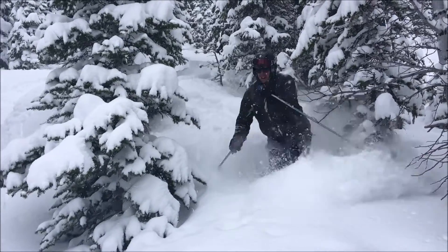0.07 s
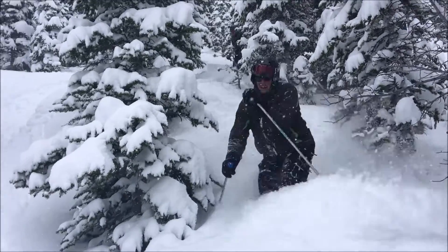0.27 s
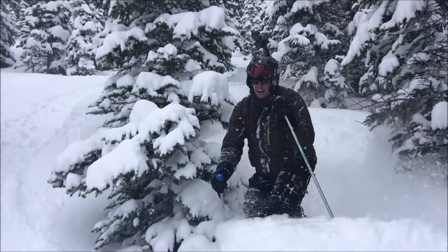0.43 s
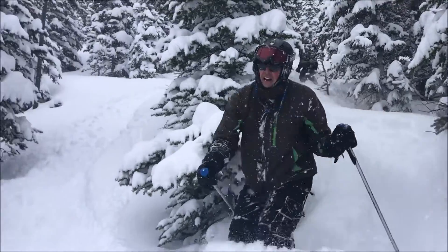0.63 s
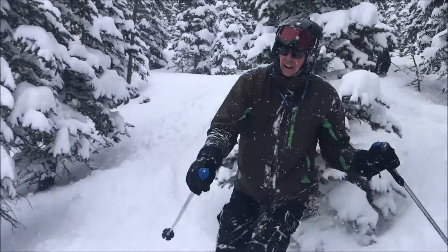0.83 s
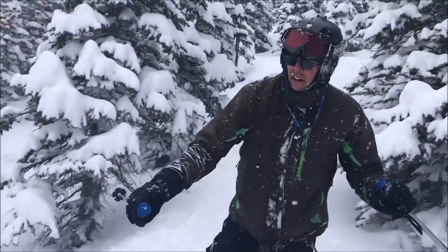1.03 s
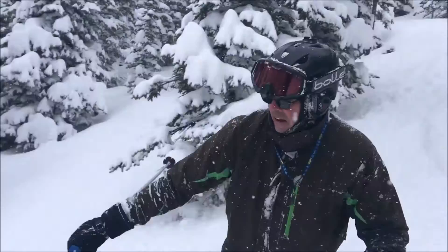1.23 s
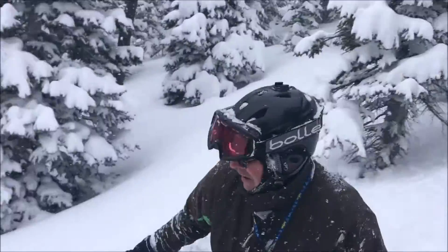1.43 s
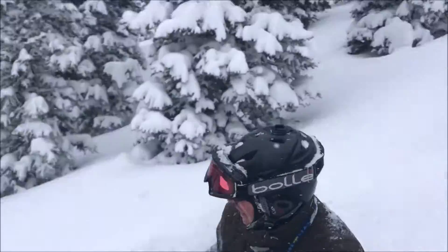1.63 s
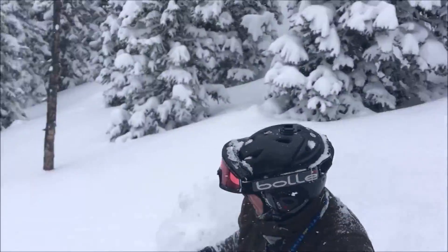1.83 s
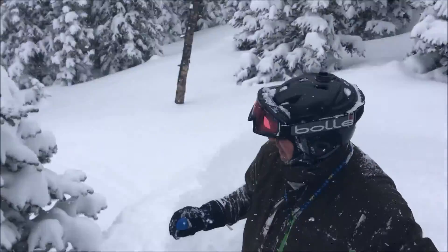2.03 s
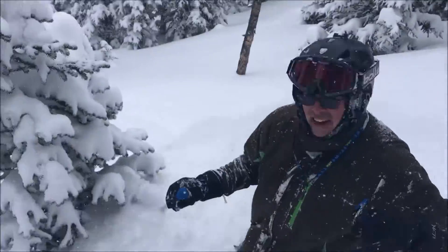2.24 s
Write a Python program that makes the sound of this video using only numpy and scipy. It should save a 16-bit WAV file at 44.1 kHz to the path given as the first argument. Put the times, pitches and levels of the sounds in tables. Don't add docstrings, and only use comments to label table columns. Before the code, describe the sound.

Skis hiss and crunch through deep powder snow, with a bright metallic pole clink and wind rumble

```python
import sys
import numpy as np
from scipy import signal
from scipy.io import wavfile
from scipy.ndimage import uniform_filter1d

SR = 44100
rng = np.random.default_rng(int(sys.argv[2]) if len(sys.argv) > 2 else 0)


def ratio(d):
    e = np.asarray(d, float) / 20
    return 10 ** e


def digitize_waveform(pressure):
    field = np.atleast_2d(pressure).T
    bounded = np.clip(field, -1, 1)
    quanta = np.round(bounded * 32767).astype(np.int16)
    wavfile.write(sys.argv[1], SR, quanta)


N = 101429


def rms_one(x):
    return x / np.sqrt(np.mean(x ** 2) + 1e-20)


def butter(x, order, hz, kind="low"):
    return signal.sosfilt(signal.butter(order, hz, kind, fs=SR, output="sos"), x)


def place(out, start_s, sound):
    room = out[int(start_s * SR):][:len(sound)]
    room += sound[:len(room)]


def in_time(rows):
    time_s, *columns = np.transpose(rows)
    return [np.interp(np.arange(N) / SR, time_s, c) for c in columns]


def drift(rate_hz):
    r = np.exp(-80 * np.pi * rate_hz / SR)
    slow = signal.lfilter([1], [1, -2 * r, r * r], rng.standard_normal(N // 40 + 2002))[2000:]
    return np.interp(np.arange(N) / 40, np.arange(len(slow)), rms_one(slow))


def ring(drive, hz, t60_s):
    r, w = ratio(-60 / (t60_s * SR)), 2 * np.pi * hz / SR
    return signal.lfilter([0, np.sin(w)], [1, -2 * r * np.cos(w), r * r], drive + 1e-18)


def coloured(sources, colour, patchy_db, rate_hz, tilt_db=0):
    hz, db = np.transpose(colour)
    edges_hz = hz[0] * 2 ** np.arange(0, np.log2(hz[-1] / hz[0]) + .34, 1 / 3)
    edges_hz = np.minimum(edges_hz, .45 * SR)
    out, together = 0, drift(rate_hz)
    for k, (low, high) in enumerate(zip(edges_hz, edges_hz[1:])):
        band = butter(sources[k % 2], 2, [low, high], "band")
        level_db = np.interp(np.log(low * high) / 2, np.log(hz), db)
        level_db = level_db + tilt_db * (k / len(edges_hz) - .4)
        flicker = .8 * together + .7 * drift(rate_hz * 1.5)
        out = out + band * ratio(level_db + patchy_db * flicker)
    return rms_one(out)


# (time [s], level [dB], brightness [dB])
WIND_GUSTS = [(0, -41, -13), (.1, -58.5, 0), (.17, -50, 5), (.42, -53, 1), (.55, -49, 22), (.72, -47.5, -9),
              (.92, -49.5, -14), (1.03, -53, 5), (1.17, -43.5, -5), (1.33, -51.5, -1), (1.45, -42, -21),
              (1.53, -49.5, -4), (1.67, -42, 9), (1.8, -41, -1), (1.9, -51, 8), (2, -45.5, 10),
              (2.12, -47.5, 4), (2.3, -51, 20.5)]
# (frequency [Hz], density [dB per Hz])
WIND_SPECTRUM = [(12, -42), (20, -58), (37, -1.5), (65, -4), (151, -8.5), (229, -19.5), (321, -23.5),
                 (500, -33), (650, -30), (1100, -120)]


def wind():
    db, bright_db = in_time(WIND_GUSTS)
    noise = rng.standard_normal((2, N))
    return ratio(db) * coloured(noise, WIND_SPECTRUM, patchy_db=1.4, rate_hz=12, tilt_db=bright_db)


# (time [s], level [dB])
SPRAY_LEVEL = [(0, -47), (.08, -59), (.2, -53), (.4, -57), (.53, -60), (.64, -55), (.72, -49.5),
               (.87, -58.5), (1.03, -56.5), (1.2, -57.5), (1.3, -52), (1.5, -53), (1.63, -50.5),
               (1.66, -50), (1.8, -53), (1.95, -55), (2.08, -63), (2.3, -59.5)]
# (frequency [Hz], density [dB per Hz])
SPRAY_SPECTRUM = [(2500, -5.5), (4000, 0.5), (5000, -8.5), (6500, 6.5), (7500, -4), (10500, 3),
                  (13000, 1.5), (17000, 4.5)]


def spray():
    db, = in_time(SPRAY_LEVEL)
    noise = rng.standard_normal((2, N))
    return ratio(db + 1.1) * coloured(noise, SPRAY_SPECTRUM, patchy_db=.55, rate_hz=16)


# (start [s], end [s], level [dB], start frequency [Hz], end frequency [Hz], width [Hz])
BRUSHES = [
    (1.63, 1.97, -65, 7300, 7250, 130),
    (1.13, 1.37, -62, 1550, 1600, 250),
    (1.78, 2.13, -64, 1280, 1330, 160),
    (1.93, 2.17, -66, 1600, 1950, 160),
    (.57, .8, -63, 3350, 3450, 400),
    (.57, .78, -64, 1300, 1400, 350),
    (.88, 1.1, -57, 160, 170, 80),
    (1.2, 1.4, -56, 190, 170, 90),
    (1.64, 1.82, -60, 13500, 13500, 4000),
]


def rubs():
    out, t = np.zeros(N), np.arange(N) / SR
    for start_s, end_s, db, from_hz, to_hz, width_hz in BRUSHES:
        u = np.clip((t - start_s) / (end_s - start_s), 0, 1)
        slow = butter(rng.standard_normal((2, N)), 2, width_hz / 2)
        phase = 2 * np.pi * np.cumsum(from_hz + (to_hz - from_hz) * u) / SR
        band = rms_one(slow[0] * np.cos(phase) + slow[1] * np.sin(phase))
        out += ratio(db) * np.sin(np.pi * u) ** .4 * band
    return out


# (time [s], level [dB])
SKI_PRESSURE = [(0, -61.5), (.3, -58.5), (.42, -65.5), (.52, -63), (.58, -58.5), (.72, -56), (.87, -58),
                (1.02, -61.5), (1.15, -55.5), (1.27, -54.5), (1.38, -56.5), (1.62, -55.5), (1.7, -51.5),
                (1.8, -53.5), (1.92, -56), (2.3, -56.5)]
# (frequency [Hz], density [dB per Hz])
CRUNCH_SPECTRUM = [(250, -16), (500, 0), (800, -0.5), (1400, 1.5), (2300, -2), (3300, -3.5), (5000, -8),
                   (8000, -10.5)]
GRAINS_PER_S, GRAIN_DB, GRAIN_SPREAD_DB = 400, -10, 4.5


def crunch():
    db, = in_time(SKI_PRESSURE)
    rate_per_s = GRAINS_PER_S * ratio(5.4 * drift(9.3))
    sizes = ratio(GRAIN_SPREAD_DB * np.minimum(rng.exponential(1, N), 5)) * rng.choice([-1, 1], N)
    grains = rms_one(sizes * (rng.random(N) < rate_per_s / SR))
    mix = rng.standard_normal((2, N)) + ratio(GRAIN_DB) * grains
    return ratio(db + 0.9) * coloured(mix, CRUNCH_SPECTRUM, patchy_db=1.3, rate_hz=14)


# (time [s], level [dB], frequency [Hz], length [cycles])
PACKING_THUDS = [(1.071, -36, 117, 1.43), (1.093, -35, 65.3, 2), (1.421, -41, 72, 4),
                 (1.650, -31.5, 153, 2), (1.6777, -33, 171, 2.3), (1.725, -32, 125, 1.1),
                 (1.7404, -31.5, 110, 1.65), (1.777, -30.5, 70.7, 4.3), (1.946, -33, 54, 1.7),
                 (1.995, -33, 52, 1.47), (2.196, -32.5, 62, 1.37)]


def thuds():
    out, t = np.zeros(N), np.arange(N) / SR
    for s, db, hz, cycles in PACKING_THUDS:
        u = np.clip((t - s) * hz / cycles, 0, 1)
        out += ratio(db) * np.sin(np.pi * u ** 0.76) * np.sin(2 * np.pi * hz * (t - s))
    return out


# (time [s], length [s], level [dB], top frequency [Hz])
CLUMP_SCUFFS = [(0.107, 0.0078, -55.5, 1780), (0.236, 0.0028, -63, 2510), (0.268, 0.0044, -47.5, 1300),
                (0.302, 0.023, -45.5, 4420), (0.302, 0.011, -43.5, 1300), (0.618, 0.022, -52.5, 3880),
                (0.711, 0.0079, -48.5, 2600), (1.334, 0.007, -51.5, 800), (1.436, 0.0091, -55.5, 900),
                (1.449, 0.0069, -55, 900), (1.65, 0.013, -48.5, 431), (1.682, 0.0098, -45, 800),
                (1.717, 0.026, -47, 4440), (1.738, 0.0039, -47, 8000), (1.724, 0.032, -42, 396),
                (1.826, 0.0079, -53, 2000), (2.035, 0.0057, -56, 700), (2.192, 0.0044, -48, 890),
                (.192, 0.024, -52, 5050)]


def scuffs():
    out, t = np.zeros(N), np.arange(SR // 10) / SR
    for s, length_s, db, top_hz in CLUMP_SCUFFS:
        noise, lumps = rng.standard_normal((2, len(t)))
        ragged = noise * ratio(3.5 * rms_one(uniform_filter1d(lumps, size=30)))
        fade = np.exp(-np.maximum(t - .7 * length_s, 0) / (.3 * length_s))
        shape = np.minimum(t / (.15 * length_s), 1) * fade
        burst = butter(ragged * shape, 1, [top_hz * 0.25, min(top_hz, .4 * SR)], "band")
        burst = butter(burst, 2, [230, min(top_hz * 1.4, .44 * SR)], "band")
        place(out, s, ratio(db) * rms_one(burst) * np.sqrt(np.mean(shape ** 2)))
    return out


# (time [s], level [dB], frequency [Hz], length [cycles])
CRUST_SNAPS = [(.488, -40, 1100, 2), (.5425, -41, 950, 4), (.550, -43.5, 1160, 4),
               (.5605, -32.5, 1100, 1.6), (.628, -39.5, 1310, 8), (.6825, -42, 1100, 3),
               (.7078, -35, 1500, 1.4), (0.7082, -33, 3250, 5.5), (0.71, -42, 1410, 5.5),
               (.712, -37, 700, 3), (.735, -44.5, 850, 6.8), (.770, -48, 900, 3), (.894, -41, 890, 3.4),
               (1.7178, -39, 5300, 12.6), (1.7198, -29, 1820, 2.6), (1.7212, -34, 1100, 2.2),
               (1.7228, -44, 2000, 2.2), (1.7242, -28.5, 2380, 3), (1.7262, -36, 900, 1.6),
               (1.7274, -24.5, 1030, 3.2), (1.7305, -29, 2080, 3.5), (1.732, -27, 1500, 3),
               (1.734, -27, 1510, 4.5), (1.7392, -38, 3500, 5), (1.7418, -28, 3500, 5.1),
               (1.7425, -28.5, 1520, 4.3), (1.746, -27, 1800, 3.8), (2.188, -43, 550, 1.5),
               (.1045, -38.5, 3340, 5.4), (0.1048, -45, 1600, 2), (0.193, -40, 4500, 3),
               (.228, -39, 1750, 9.8), (0.255, -38, 1800, 6.5), (1.695, -38, 1050, 4.9)]


def snaps():
    out, click = np.zeros(N), 1. * (np.arange(SR // 20) == 0)
    for s, db, hz, cycles in CRUST_SNAPS:
        place(out, s, ratio(db) * ring(click, hz, 1.64 * cycles / hz))
    return out


# (time [s], snap level [dB], fizz level [dB], ring level [dB], ring damped at [s])
POLE_KNOCKS = [(0.0607, -61, -47.5, -49, 0.072), (0.1043, -38.5, -44, -36.5, 0.13),
               (0.118, -42, -46, -47, 0.13), (0.1931, -37, -43.5, -48, 0.76),
               (0.2288, -24.5, -36, -90, 0.5), (0.237, -5.5, -22, -39, 0.25),
               (0.2413, -26, -26.5, -90, 0.23), (0.2547, -40, -22, -90, .3),
               (0.2554, -50, -22.5, -27, 0.395), (.264, -50, -34, -90, 0.28),
               (.3015, -46, -37.5, -90, 0.26), (0.305, -42, -32.5, -90, 0.33),
               (0.3195, -34, -40, -91.5, 0.57), (0.394, -46, -56, -50, .45)]
# (frequency [Hz], level [dB], t60 [s])
TUBE_MODES = [(7094, -2, .42), (7165, -3, .3), (7210, 0, .11), (7352, -5, .05)]
# (frequency [Hz], level [dB], t60 [s])
FIZZ_MODES = [(2280, -34, 0.0035), (3500, -17, 0.011), (4510, -18, 0.0078), (6000, -31, 0.0038),
              (8430, -1, 0.0119), (9600, 14, 0.0043), (11100, 11, 0.0025), (11600, 13, 0.0021),
              (13000, 13, 0.0056), (14500, -29, .003), (15700, -25, 0.0027)]
# (time [s], level [dB], swell [s], t60 [s], until [s])
TUBE_SWING = (.443, -49.5, .016, .33, .565)
# (time [s], level [dB], frequency [Hz], t60 [s])
PLASTIC_TICKS = [(0.1052, -44.5, 1351, 0.028), (0.193, -40, 2370, 0.021), (0.197, -50, 3380, 0.06),
                 (0.23, -37, 3500, 0.012), (.237, -31.5, 3174, .012), (.2553, -34, 13600, .03),
                 (0.2559, -29, 8060, 0.038), (0.255, -32.5, 10840, 0.025), (0.2542, -30, 9200, 0.019),
                 (0.2548, -34, 4215, 0.013), (0.2657, -36.5, 1252, 0.0296), (.265, -36, 820, 0.014),
                 (.302, -36.5, 436, 0.027), (.307, -42.5, 1550, 0.048), (.311, -35.5, 1154, 0.028),
                 (.305, -48, 3178, 0.083), (.305, -51.5, 8140, 0.037)]
SNAP_HZ, SNAP_T60_S, SNAP_ABOVE_HZ = 10800, .0012, 6500
FIZZ_T60_S, FIZZ_ATTACK_S = .021, .0014
RING_ATTACK_S, DAMP_S = .00116, .004


def pole():
    out, t = np.zeros(N), np.arange(SR // 2) / SR
    click = 1. * (t == 0)
    snap = butter(ring(click, SNAP_HZ, SNAP_T60_S), 2, SNAP_ABOVE_HZ, "high")
    snap = snap / snap.max()
    tube = sum(ratio(db) * ring(click, hz, t60_s) for hz, db, t60_s in TUBE_MODES) / 2
    fizz_shape = ratio(-60 * t / FIZZ_T60_S) * np.minimum(t / FIZZ_ATTACK_S, 1)
    for s, snap_db, fizz_db, ring_db, until_s in POLE_KNOCKS:
        noise = rng.standard_normal(len(t))
        fizz = rms_one(sum(ratio(db) * ring(noise, hz, t60_s) for hz, db, t60_s in FIZZ_MODES))
        fizz = fizz[::-1] * fizz_shape
        held = np.minimum(t / RING_ATTACK_S, 1) * np.exp(-np.maximum(t + s - until_s, 0) / DAMP_S)
        place(out, s, ratio(snap_db) * snap + ratio(fizz_db) * fizz + ratio(ring_db) * tube * held)

    s, db, swell_s, t60_s, until_s = TUBE_SWING
    swell = np.clip(t / swell_s, 0, 1) * np.clip((until_s - s - t) / swell_s, 0, 1)
    place(out, s, ratio(db) * swell * ring(click, TUBE_MODES[0][0], t60_s))

    for s, db, hz, t60_s in PLASTIC_TICKS:
        place(out, s, ratio(db) * ring(click, hz, t60_s))
    return out


def scene():
    x = wind() + spray() + rubs() + crunch() + thuds() + scuffs() + snaps() + pole()
    return np.array([x, x])


def band_limit(x):
    return signal.sosfilt(signal.butter(12, 16970, fs=SR, output="sos"), x)


# (time [s], depth [0-1], faint thin tones sounding in the dip [Hz] ..)
DROPOUTS = [
    (.361, .9, 3400, 7140, 9650),
    (1.171, .9, 1000, 1650, 4100, 12500),
    (1.853, .85, 1350, 7350, 13250),
    (2.131, .9, 1900, 5750, 14400),
]
DROPOUT_S, DROPOUT_ABOVE_HZ, LINE_DB = .028, 450, -62


def record(dry):
    t, x = np.arange(N) / SR, dry.copy()
    low = signal.sosfiltfilt(signal.butter(2, DROPOUT_ABOVE_HZ, fs=SR, output="sos"), dry)
    for s, depth, *lines_hz in DROPOUTS:
        dip = np.cos(np.pi / 2 * np.clip((t - s) / DROPOUT_S * 2, -1, 1)) ** 2
        lines = ratio(LINE_DB) * sum(np.sin(2 * np.pi * hz * t) for hz in lines_hz)
        x += dip * (lines - depth * (dry - low))
    x = butter(x, 2, 36, "high")
    x = signal.sosfilt(signal.ellip(11, .1, 55, 15780, fs=SR, output="sos"), x)
    return band_limit(x)


dry = scene()
out = record(dry)
digitize_waveform(out)
```